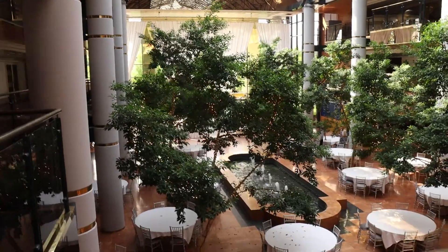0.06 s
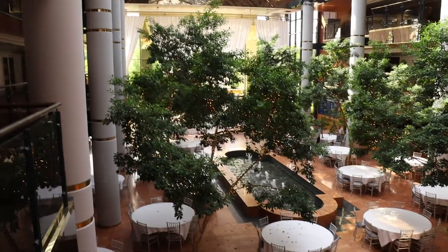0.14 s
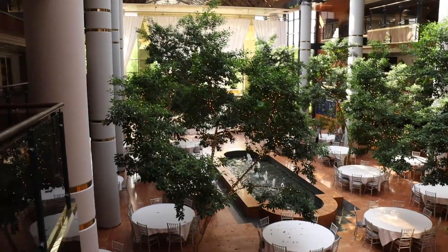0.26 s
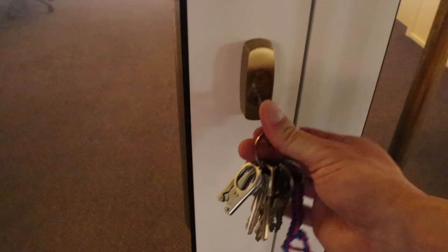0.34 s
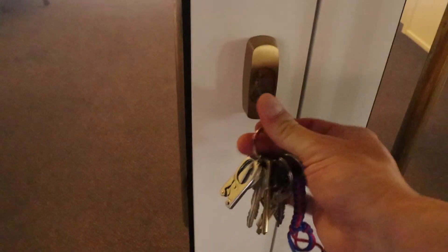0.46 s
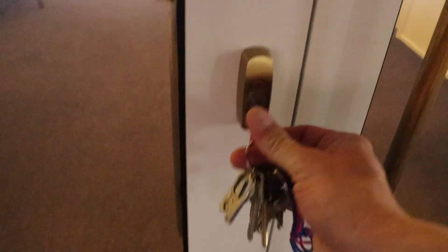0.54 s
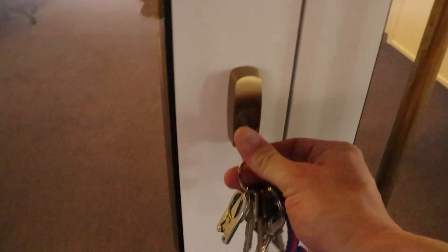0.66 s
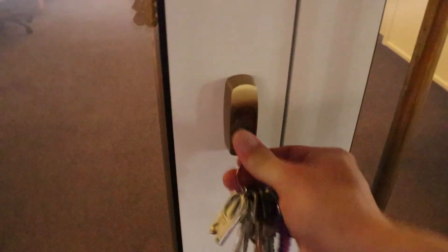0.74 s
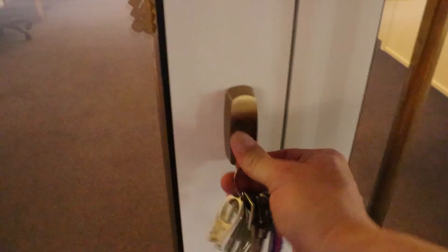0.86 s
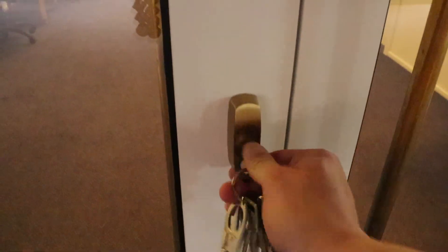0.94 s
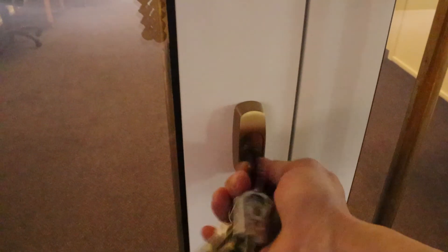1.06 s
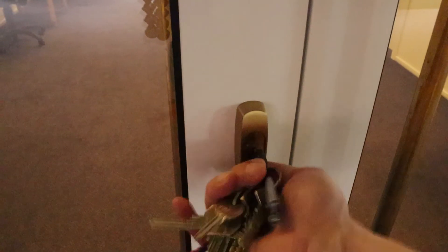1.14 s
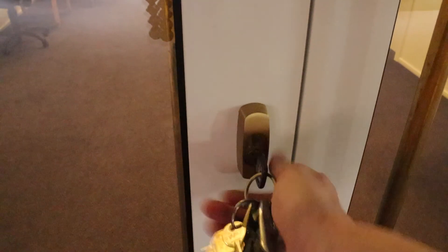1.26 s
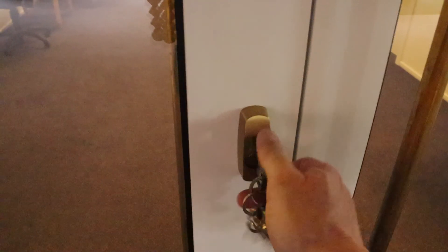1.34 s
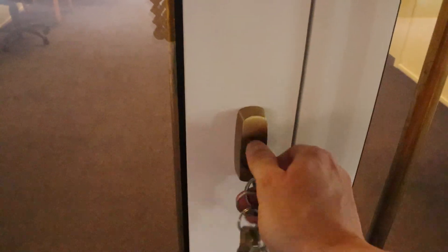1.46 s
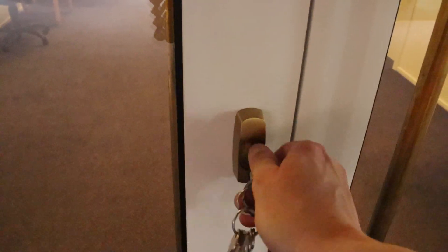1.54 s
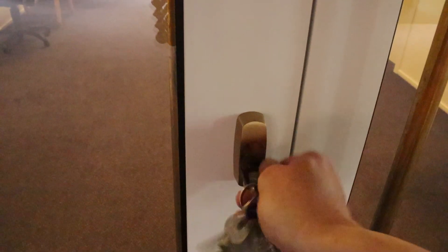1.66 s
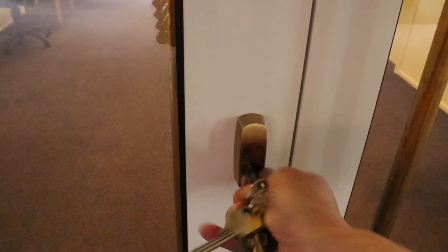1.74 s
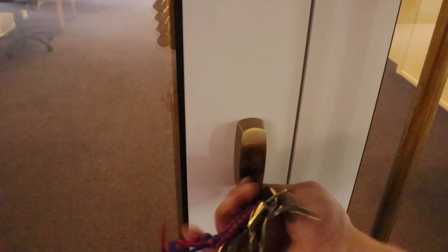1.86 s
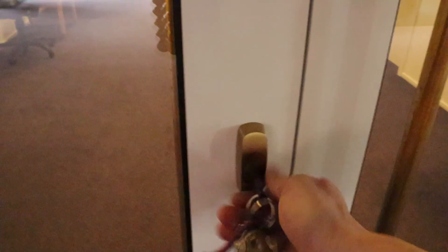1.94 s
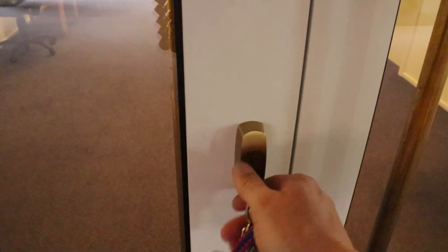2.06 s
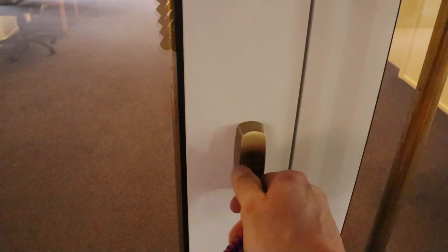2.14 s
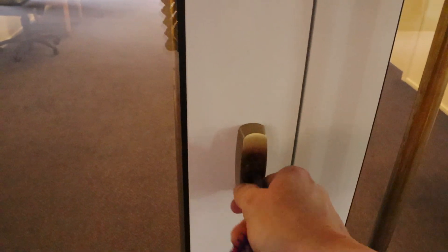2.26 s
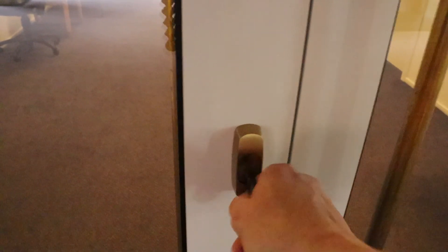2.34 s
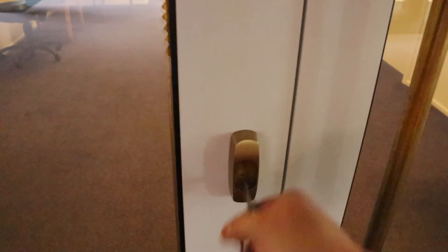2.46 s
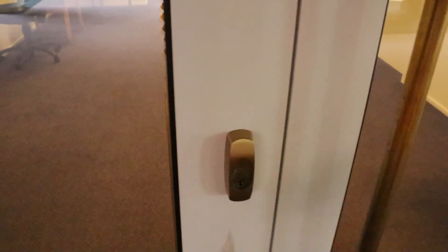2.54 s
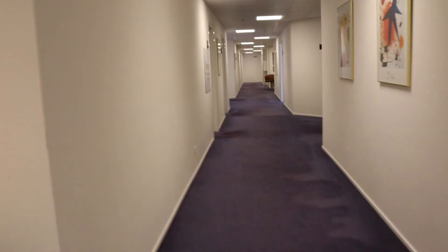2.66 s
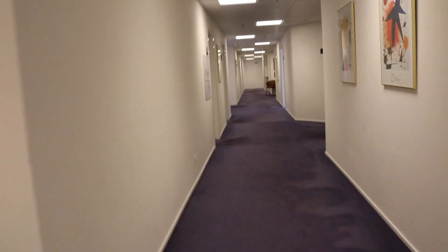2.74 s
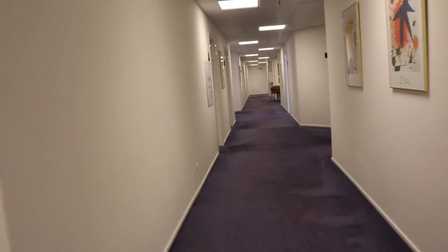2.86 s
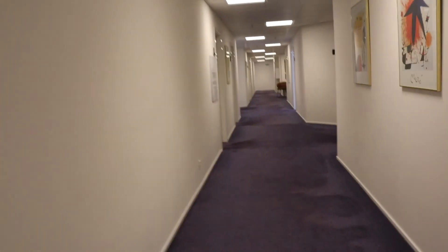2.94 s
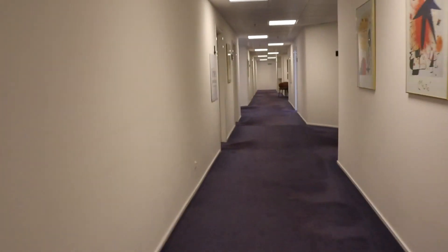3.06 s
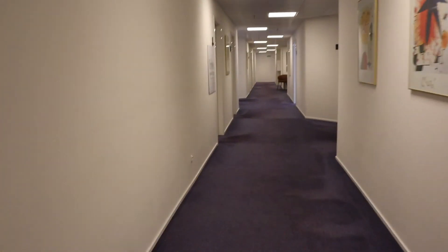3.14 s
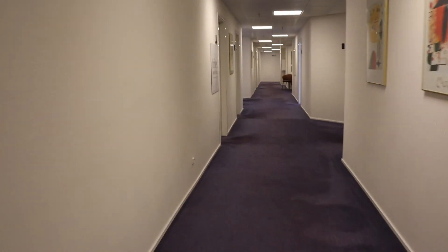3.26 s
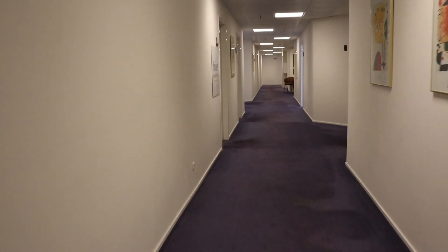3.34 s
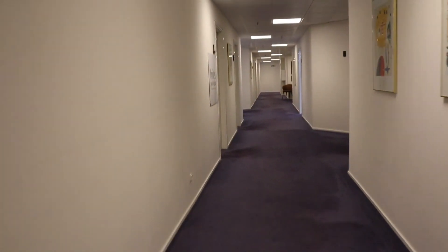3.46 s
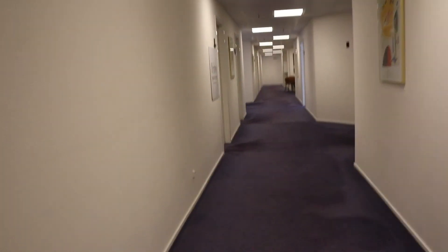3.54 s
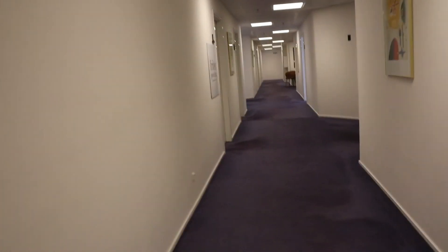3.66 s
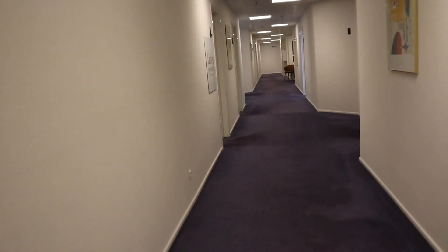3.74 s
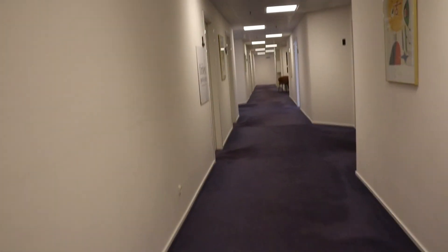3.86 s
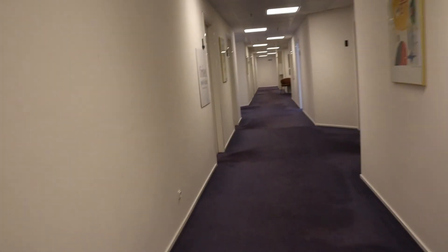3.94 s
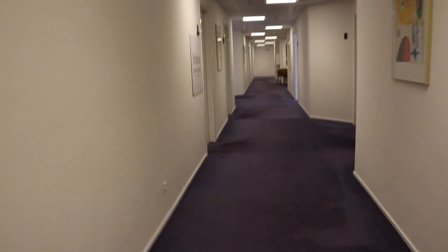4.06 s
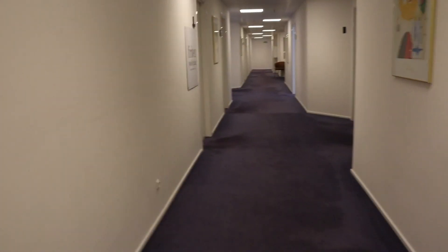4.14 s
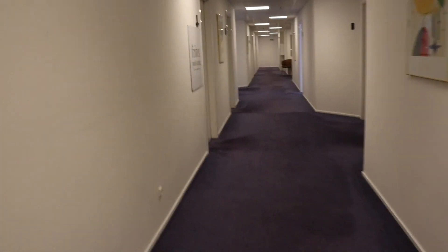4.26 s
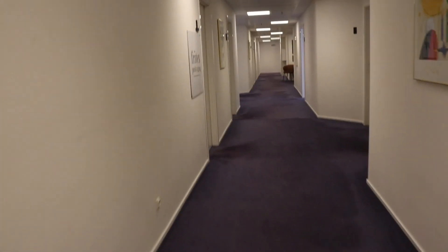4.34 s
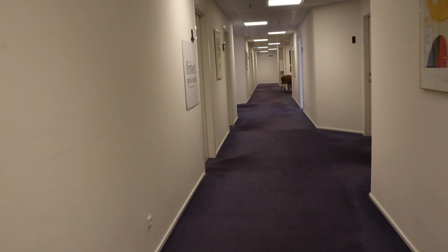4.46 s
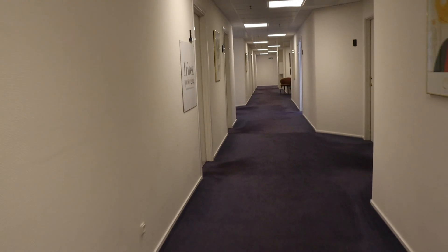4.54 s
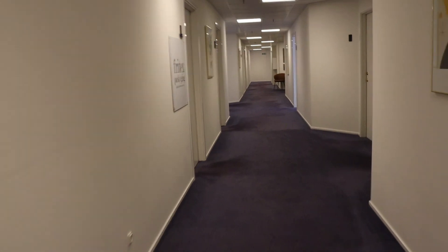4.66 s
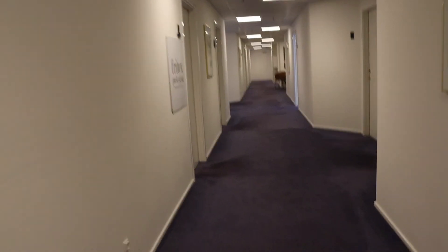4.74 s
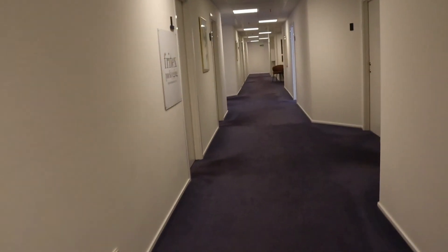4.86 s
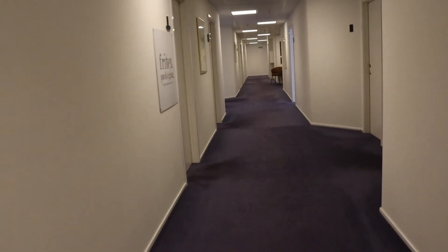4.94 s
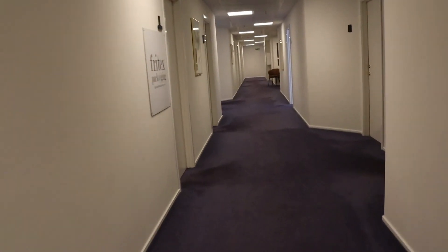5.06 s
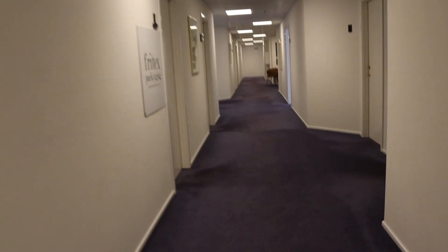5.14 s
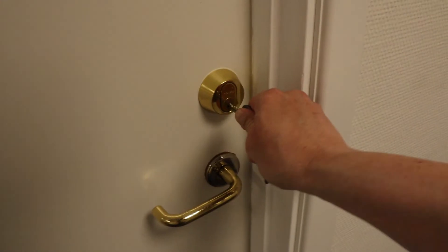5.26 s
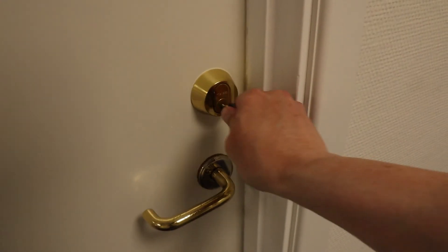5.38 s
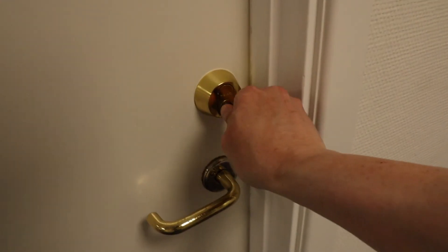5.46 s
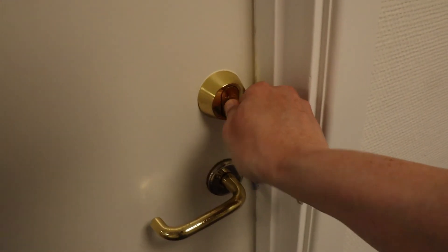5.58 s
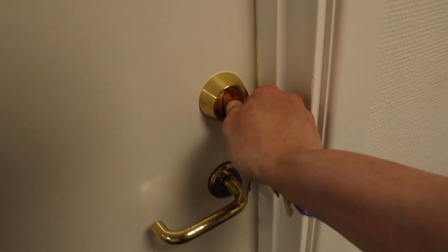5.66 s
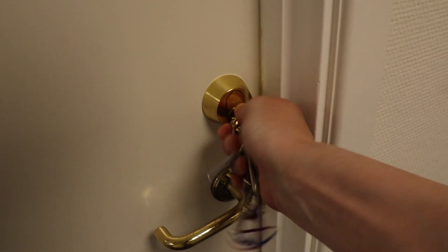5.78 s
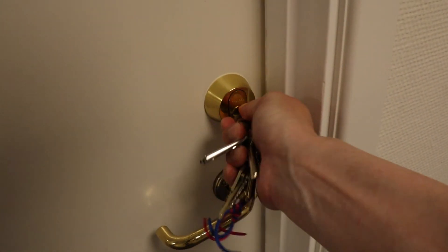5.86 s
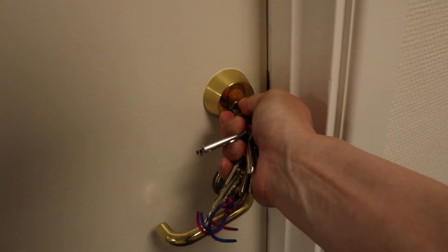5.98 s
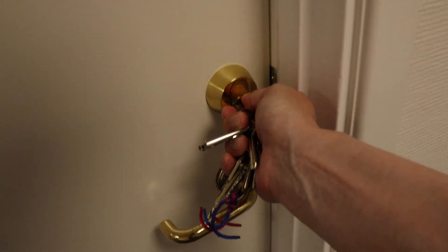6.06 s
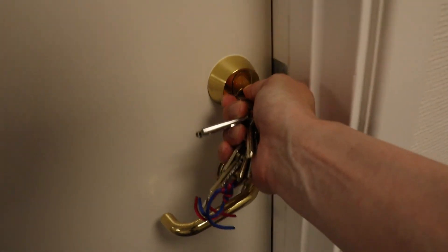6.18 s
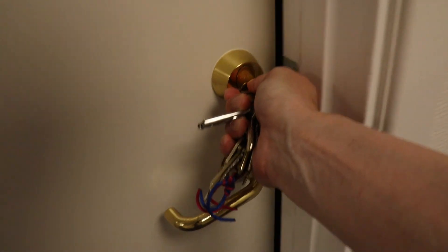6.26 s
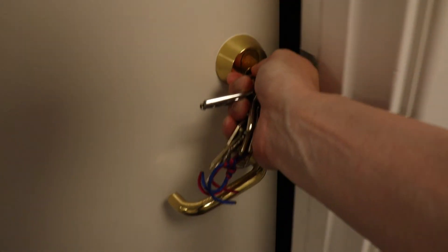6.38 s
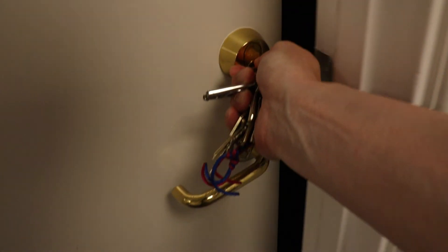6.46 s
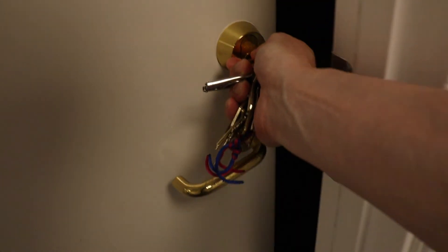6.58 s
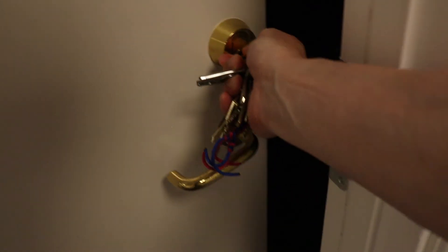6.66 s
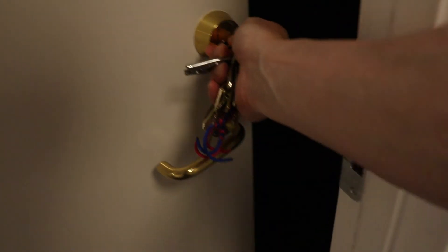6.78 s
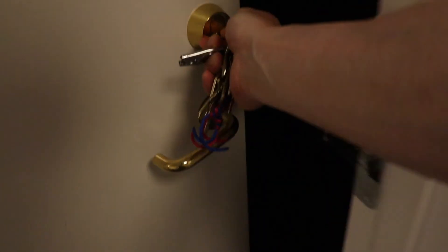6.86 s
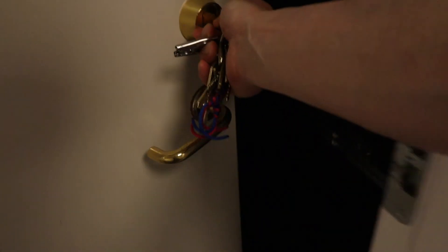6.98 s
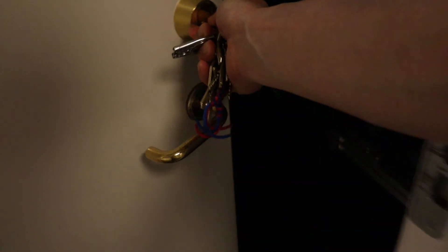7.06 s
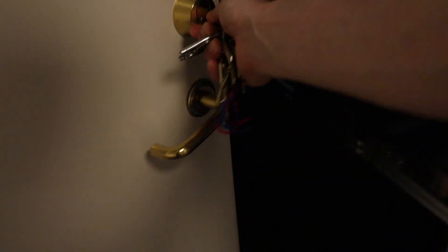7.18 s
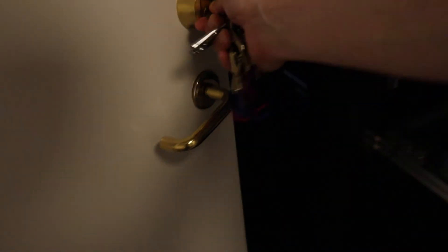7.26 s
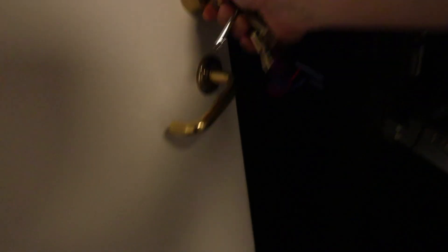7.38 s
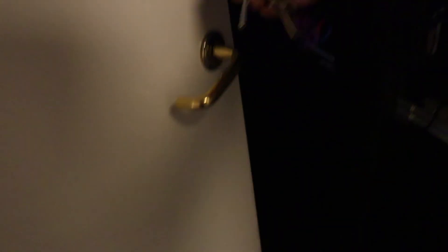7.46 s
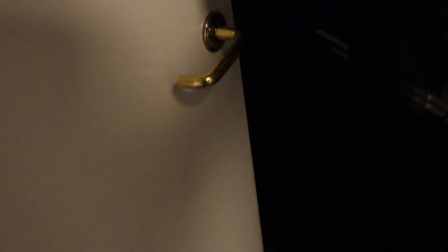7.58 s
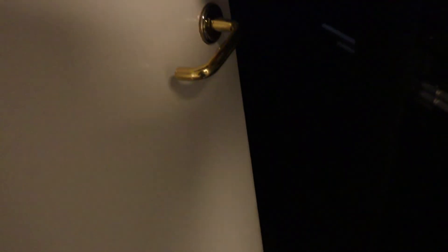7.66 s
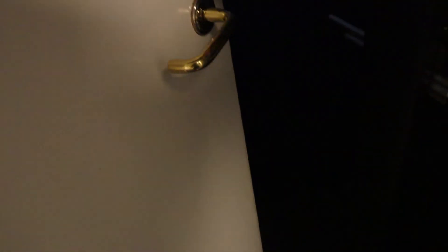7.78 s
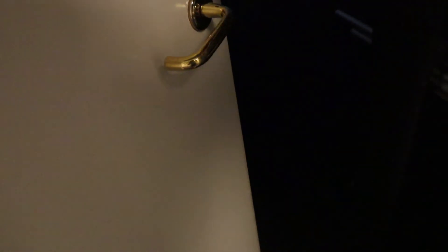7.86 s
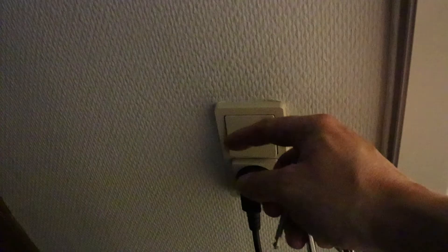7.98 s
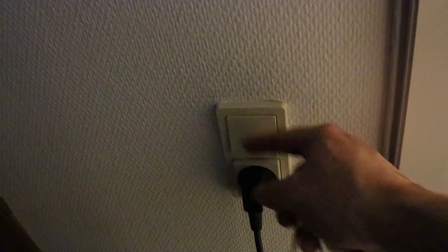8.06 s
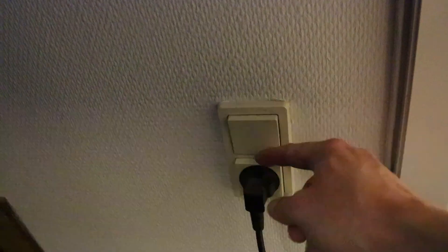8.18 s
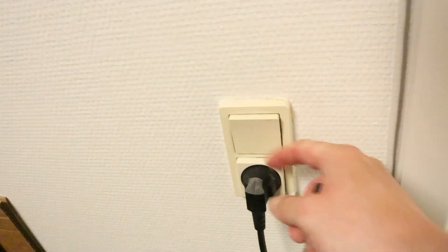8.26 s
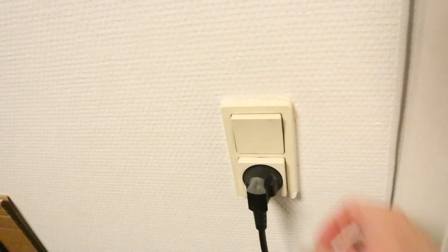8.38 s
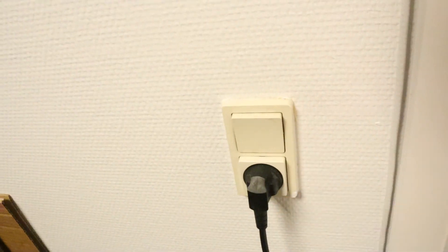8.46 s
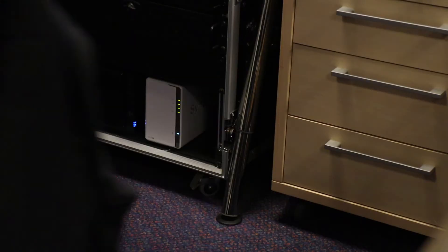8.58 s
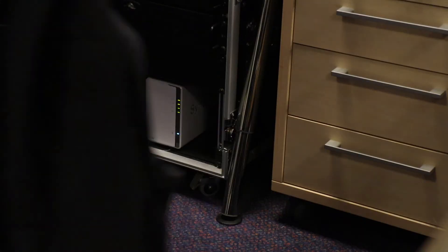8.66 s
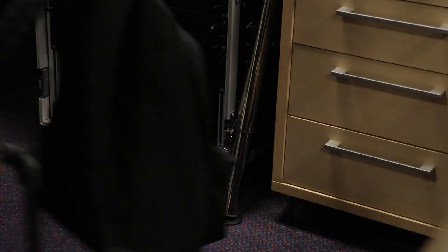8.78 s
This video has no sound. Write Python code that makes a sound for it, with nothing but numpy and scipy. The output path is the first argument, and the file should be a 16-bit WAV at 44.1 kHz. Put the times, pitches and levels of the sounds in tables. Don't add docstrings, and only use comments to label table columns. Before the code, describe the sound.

A door lock is worked with a jangling bunch of keys, followed by muffled carpet footsteps, quieter key clicks, a door thud and a switch click.

```python
import sys
import numpy as np
from scipy import signal
from scipy.fft import rfft, irfft
from scipy.io import wavfile
from scipy.ndimage import uniform_filter1d

SR = 44100
rng = np.random.default_rng(int(sys.argv[2]) if len(sys.argv) > 2 else 0)


def generate_wav(sig):
    pcm = np.round(np.clip(np.atleast_2d(sig).T, -1, 1) * 32767).astype(np.int16)
    wavfile.write(sys.argv[1], SR, pcm)


def linear_from_db(decibels):
    return 10 ** (np.asarray(decibels, float) / 20)


N = 388962
SIZE = 8192
HZ = np.fft.rfftfreq(SIZE, 1 / SR)
AGE_S = np.arange(SIZE) / SR

CUTS_S = 2.675, 8.032
# (time [s], clack [dB], door thud [dB re clack],
# tick [dB re clack], rattle t60 [s])
LOCK_1_BLOWS = [(.539, -37, -4, -19, 0.018), (.606, -55, -18, -30, 0.011), (.828, -31, -5.5, -28, 0.055),
                (.844, -28.5, 0.5, -47, 0.039), (.857, -17.5, -6.5, -22, 0.033), (.915, -39, 6, -6, 0.03),
                (1.022, -21.5, -4.5, -36, 0.028), (1.179, -38, -1, -20, 0.042), (1.197, -43, 3, -15, 0.28),
                (1.254, -49, 9, -4, 0.053), (1.337, -45, -2.5, 2, 0.099), (1.364, -35, -15, -23, 0.065),
                (1.445, -41, -3, -43.5, 0.021), (1.68, -30.5, 3, -24.5, 0.1),
                (1.734, -8.5, -2.5, -17, 0.049), (1.763, -23, -0.5, -16.5, .04),
                (1.921, -53, -22, 12, 0.12), (1.981, -48, -8, 2, 0.25), (2.428, -37.5, -4, -13.5, 0.076),
                (2.448, -28.5, -8, -47, 0.052), (2.49, -27, -4.5, -41, 0.042),
                (2.543, -30.5, -1.5, -28, 0.13), (2.566, -39, -14, -2.5, 0.012)]
# (time [s], clack [dB], door thud [dB re clack], tick [dB re clack])
KEY_ENTRY = [(3.014, -55, -16, -67.5), (3.461, -65.5, -1.5, -59), (3.718, -62.5, -6.5, -59.5),
             (4.134, -54.5, 1, -70.5), (5.241, -67, -4, -43.5), (5.293, -60.5, 1, -47),
             (5.307, -65, 4, -33), (5.332, -50, -4, -60), (5.363, -50.5, -4, -20),
             (5.395, -40, -6.5, -11.5), (5.413, -43, -4.5, -27), (5.436, -42.5, -1, -10),
             (5.447, -41.5, -1, -10.5), (5.473, -39.5, -2.5, -9.5), (5.495, -34, -5.5, -20),
             (5.502, -40.5, 0, -7), (5.518, -31.5, 0.5, -43), (5.531, -30, -19, -7)]
ENTRY_T60_S = 0.067
# (time [s], clack [dB], thud [dB re clack], tick [dB re clack], t60 [s])
KEY_TURN = [(5.674, -27.5, -11.5, -11.5, 0.059), (5.69, -29.5, -10, -64, 0.046), (5.756, -38, 0, -67, 0.26),
            (5.772, -25.5, -0.5, -6, 0.036), (5.786, -28, -28, -3, 0.049), (5.779, -23, -9, -13, 0.032),
            (5.79, -29.5, -14, -8, 0.052), (5.797, -29, -29, -6, 0.042), (5.85, -31, -9, -20, 0.22),
            (5.86, -25.5, -17, -15.5, 0.12), (5.887, -27, -3, -16, 0.069), (5.936, -36, -1, -25, 0.048),
            (5.996, -39, -3.5, -34, 0.13), (6.031, -54, -23, 1, 0.042), (6.058, -39, -14, -8, 0.24),
            (6.07, -29.5, -12, -5.5, 0.032), (6.235, -44.5, -6, -36, 0.079), (6.51, -54, 2.5, -23, 0.053),
            (6.554, -55.5, -7, -23, 0.044)]
# (time [s], clack [dB], thud [dB re clack], tick [dB re clack], t60 [s])
KEY_EXIT = [(7.154, -58, -22, -27, 0.055), (7.273, -75, -1, 3.5, 0.021), (7.355, -54, -2, -26, 0.098),
            (7.372, -44, -16, -13, 0.036), (7.386, -39, -8, -16, 0.079), (7.411, -46.5, -7, -4.5, 0.047),
            (7.462, -44, 2, -24, 0.2), (7.492, -23.5, -15.5, -15.5, 0.048), (7.549, -45, 5.5, -10, 0.17),
            (7.571, -38.5, -4, -11, 0.13), (7.609, -46.5, 5.5, -5.5, 0.12), (8.019, -70, -10, 7, 0.045)]
# (time [s], clack [dB], wall thud [dB re clack], tick [dB re clack], rattle t60 [s])
SWITCH_SNAPS = [
    (8.144, -38.5, -0.5, -21, 0.044),
    (8.165, -30.5, -3, 7, 0.039),
    (8.258, -66.5, -10, 7, 0.013),
    (8.386, -73, 4, 2.5, 0.016),
]
# (time [s], clack pitch [Hz], snap pitch [Hz],
# extra snap [dB])
PART_ACCENTS = [(.828, 1230, 3570, -3), (.844, 2600, 4200, 0.6), (4.134, 855, 1990, -2),
                (5.396, 1850, 2940, -3), (5.772, 1060, 3150, -5), (7.386, 1490, 2390, -4),
                (.857, 1040, 3470, 3.5), (1.022, 1690, 3600, 4.5), (1.364, 1660, 2880, -7),
                (1.68, 1880, 2900, -9), (1.734, 1650, 2850, 1), (1.763, 1450, 3900, -4),
                (5.674, 1800, 2540, -4), (5.691, 960, 3030, -3), (5.785, 1150, 3030, 0.5),
                (5.86, 1940, 2580, -2.5), (5.888, 1110, 3900, -0.3), (5.937, 1480, 3240, 7),
                (6.07, 1190, 2840, -5.5), (7.493, 1040, 3300, -1.5), (8.144, 2970, 5480, -1.5),
                (8.165, 2950, 5120, 0.5), (8.258, 3230, 5670, -7), (8.386, 3500, 5180, 1.7)]
ACCENT_DB, ACCENT_Q = 5, 4.2
# (frequency [Hz], width [Hz], level [dB])
LOCK_1_MODES = [(1140, 360, -6), (1630, 1700, -2.5), (2640, 250, 1), (2850, 260, 5), (3706, 420, 11.5),
                (4294, 2800, -2.5)]
# (frequency [Hz], width [Hz], level [dB])
LOCK_2_MODES = [(748, 60, -13), (1180, 300, -3), (1512, 90, -10), (1842, 300, 3), (2220, 500, 4),
                (3030, 650, 1.5), (4200, 510, -2.5)]
# (frequency [Hz], width [Hz], level [dB])
DOOR_1_MODES = [(170, 25, -6), (243, 16, 1.5), (290, 36, -1.5), (330, 24, -2), (355.6, 20, -2.5),
                (444.4, 99, -3.5)]
# (frequency [Hz], width [Hz], level [dB])
DOOR_2_MODES = [(156.5, 27, -0.5), (195, 91, -2.5), (367, 43, -9), (400, 154, -2.5), (486, 40, -29),
                (640, 900, 18.5)]
# (frequency [Hz], width [Hz], level [dB])
SWITCH_MODES = [(775, 410, 0.5), (1000, 340, -8.5), (1895, 980, 5), (2950, 16, -21), (3040, 330, 3),
                (7200, 30, -16), (3550, 610, -4), (4280, 400, 0.5), (5600, 1500, 9)]
# (frequency [Hz], width [Hz], level [dB])
WALL_MODES = [(145, 45.6, 1.5), (330, 46.4, -12.5), (506, 80, -9.5)]
# (time [s], stroke [s], grind [dB], rumble [dB re grind], rasp [dB re grind])
METAL_DRAGS = [
    (.815, .012, -39, -2, -17),
    (1.669, .012, -44, -2.5, -25),
    (1.708, 0.028, -38.5, -1, -22),
    (2.411, 0.1, -46, 9, -12),
    (2.52, 0.025, -38, -2, -11.5),
    (6.331, 0.497, -65, -8, -17.5),
    (7.804, 0.096, -46, 8.5, -1),
]
DRAG_RISE_S, DRAG_START_DB, DRAG_T60_S = 0.012, -24, 0.049
# (time [s], level [dB], chatter length [s])
KEY_JINGLES = [(0.876, -55, 0.054), (0.906, -51, 0.066), (0.973, -51.5, 0.0047), (1.06, -48, 0.033),
               (1.099, -53, 0.0047), (1.13, -59, 0.0094), (1.229, -52, 0.046), (1.27, -50, 0.045),
               (1.311, -47, 0.047), (1.347, -43, 0.12), (1.384, -46.5, 0.051), (1.409, -47, 0.019),
               (1.435, -47, 0.021), (1.533, -61, 0.011), (1.554, -50, 0.0063), (1.587, -65, 0.0095),
               (1.612, -52, 0.0029), (1.702, -49.5, 0.028), (1.768, -43, 0.021), (1.835, -56, 0.069),
               (1.894, -48, 0.017), (1.923, -34, 0.031), (1.997, -37.5, 0.03), (2.046, -43, 0.015),
               (2.081, -49.5, 0.076), (2.148, -43, 0.032), (2.183, -47.5, 0.025), (2.221, -44, 0.014),
               (2.253, -50.5, 0.017), (2.296, -54, 0.0034),
               (0.931, -56, 0.0088), (1.078, -64, 0.0077), (1.303, -54, .008), (1.864, -58, 0.02),
              (1.946, -43.5, 0.029), (1.978, -48, 0.012), (2.021, -40, 0.03), (2.058, -43.5, 0.017),
              (2.113, -59, 0.0093), (2.131, -53, 0.0066), (2.159, -44, .012), (2.21, -54, 0.0074)]
# (frequency [Hz], width [Hz], level [dB])
KEY_MODES = [(2000, 30, -14), (4520, 30, -8), (4980, 22, -4), (5960, 25, -4), (7280, 18, -3),
             (7850, 30, -9), (8850, 22, 0), (9620, 22, -1), (10100, 28, -1), (11750, 35, -10),
             (12170, 25, -8), (12930, 28, 2), (13940, 25, -6), (14600, 25, -7)]
FREE_RING_DB, CAUGHT_S = -7, 2.1
# (time [s], level [dB], pitch [Hz], t60 [s])
LEAF_BOOM = [
    (7.861, -36.5, 132.9, 0.68),
]
# (time [s], level [dB], pitch [Hz])
BODY_THUMPS = [(1.626, -34.5, 270), (2.905, -53, 230), (2.935, -44.5, 202), (3.004, -49, 169),
               (3.063, -46.5, 239), (3.132, -49.5, 228), (3.185, -43, 205), (3.241, -55, 168),
               (3.518, -45, 153), (3.624, -58.5, 212.6), (3.672, -58.5, 236), (3.736, -53, 217.6),
               (3.788, -48, 273), (3.835, -53, 211.6), (4.004, -42, 178.3), (4.079, -43.5, 220.4),
               (4.157, -50, 173), (4.256, -54, 157), (4.325, -48, 169.2), (4.58, -39.5, 189.6),
               (4.668, -65, 115), (4.72, -57.5, 317), (4.794, -50, 155.6), (4.858, -47, 278.6),
               (4.921, -50, 165.2), (5.019, -44, 152.4), (5.08, -41, 164.2), (5.193, -56.5, 103),
               (5.196, -48, 290), (6.901, -55, 149),
               (0.547, -47.5, 105), (0.863, -35, 110), (.925, -34, 243), (1.05, -51, 243), (2.431, -40, 101),
              (2.489, -42, 112), (2.552, -51, 100), (4.029, -47, 160), (4.11, -55, 197),
              (4.185, -51.5, 189), (4.214, -55, 262), (4.285, -52, 159), (4.625, -49, 252),
              (5.778, -45, 75.5), (5.86, -42, 90), (8.168, -45.5, 145)]
THUMP_S = 0.031
# (frequency [Hz], t60 [s])
ROOM_T60 = [(100, 0.14), (400, 0.31), (1500, 0.2), (4000, 0.093), (12000, 0.079)]
# (frequency [Hz], density [dB per Hz])
AIR_SPECTRUM = [(30, -24), (75, -23), (105, -3.5), (249, 3), (728, -1), (1290, -8.5), (5890, -35),
                (15500, -69)]
# (start [s], blend-in [s], hum [dB], body [dB], hiss [dB])
PLACE_AIR = [
    (0, .01, -61, -46, -52),
    (.5, 0.19, -54.5, -54.5, -66.5),
    (2.67, 0.0053, -70, -75.5, -81.5),
    (5.228, .008, -70, -75.5, -95.5),
    (5.33, 0.035, -71, -74.5, -88.5),
    (6.3, 0.069, -69, -74.5, -79),
    (8.03, 0.0065, -66.5, -73.5, -85.5),
    (8.598, 0.0076, -72.5, -73.5, -72.5),
]
# (hum share [dB/dB], body share [dB/dB], hiss share [dB/dB])
STIR_REACH = [(1, 0.055, 0.58), (0.72, 0.24, 2), (0.58, 0.73, 0.27), (0.087, 0.23, .1), (0.62, 1.06, 1.62),
              (0.54, 1.1, 1.14), (.3, 0.7, 1.6), (0.32, 1.13, 0.094)]
# (time [s], stir [dB], rise [s], fall [s])
AIR_STIRS = [(.6, 6.5, 0.23, 0.29), (.95, 6, 0.33, 0.46), (1.72, 8.5, 0.27, 0.6), (2.1, 6.5, 1.4, 0.28),
             (2.6, 3, 0.29, 0.21), (3.051, 13.5, 0.25, 0.26), (3.5, 8.5, 0.31, 0.43),
             (4.2, 12.5, 0.29, 0.3), (4.7, 12, 0.3, 0.48), (5.22, 12.5, 0.42, .012), (5.55, 15, 0.41, 0.79),
             (6.15, 21, 1.44, 0.51), (6.62, 12.5, 1.47, 0.56), (7.3, 0, 0.3, .4), (7.7, 9, 0.78, 0.23),
             (8.82, 8, 0.19, 0.097)]


def read(points, hz):
    f, value = np.transpose(points)
    return np.interp(np.log(hz + 1), np.log(f + 1), value)


def add(mix, s, sound):
    part = mix[round(s * SR):][:len(sound)]
    part += sound[:len(part)]


def band(hz, lo_hz, hi_hz):
    up, down = 1j * hz / lo_hz, 1j * hz / hi_hz
    high_pass = up ** 2 / (1 + np.sqrt(2) * up + up ** 2)
    return high_pass / (1 + np.sqrt(2) * down + down ** 2)


def modes(table, hz=HZ, spread_db=0):
    f, width, db = np.transpose(table)[:, :, None]
    if spread_db:
        db = db + spread_db * rng.standard_normal(db.shape)
    resonance = 1 / (1 / 2 + 1j * (hz - f) / np.maximum(width, 5))
    return (linear_from_db(db) / width * resonance).sum(0) * width.mean()


def peaked(drive, response, db):
    sound = irfft(rfft(drive, SIZE) * response, SIZE)
    peak_power = uniform_filter1d(sound ** 2, size=176).max()
    return linear_from_db(db) * sound / np.sqrt(peak_power + 1e-20)


def rattle(t60_s, grain_db, rise_s=0.0005):
    unevenness_db = grain_db * np.repeat(rng.standard_normal(SIZE // 32), 32)
    grains = rng.standard_normal(SIZE) * linear_from_db(unevenness_db)
    decay = linear_from_db(-60 * AGE_S / np.clip(t60_s, 0.004, 0.15))
    return grains * decay * np.minimum(AGE_S / rise_s, 1)


def blows(table, metal, panel, lag_s, top_hz, base_snap_db, sharp, fastest_s, crack_size):
    out = np.zeros(N)
    body = band(HZ, 630, 2000) ** 2
    edge = band(HZ, 2440, 3030) ** 2
    treble = band(HZ, 4100, top_hz) ** 2
    drum = band(HZ, 150, 1500) * band(HZ, 160, 580)
    crack = 1 + crack_size * linear_from_db(-60 * AGE_S / 0.0055)
    for s, db, thud_db, tick_db, t60_s in table:
        snap_db = base_snap_db + sharp * tick_db
        rise_s = np.clip(0.00027 * linear_from_db(-1.2 * (db + 23.5)), fastest_s, 0.005)
        drive = rattle(t60_s, 2.0, rise_s) * crack
        response = modes(metal, spread_db=2.5) + 0.8
        low, high = response * body, response * edge
        for accent_s, low_hz, high_hz, extra_db in PART_ACCENTS:
            if abs(accent_s - s) >= 0.005:
                continue
            low_part = 1 + modes([(low_hz, low_hz / ACCENT_Q, ACCENT_DB)])
            high_part = 1 + modes([(high_hz, high_hz / ACCENT_Q, ACCENT_DB - 6)])
            low = (low / abs(low).max() + 0.1) * body ** 0.5 * low_part
            high = band(HZ, 0.7 * high_hz, 1.25 * high_hz) ** 2 * high_part
            snap_db += extra_db
        clack = peaked(drive, low, db)
        snap = peaked(drive * linear_from_db(-120 * AGE_S), high, db + snap_db)
        tick = peaked(rattle(0.54 * t60_s, 3.8, rise_s / 2), treble, db + tick_db)
        panel_response = (modes(panel, spread_db=3.5) + 1.4) * drum
        thud = peaked(rattle(1.7 * t60_s, 4.4, 0.003), panel_response, db + thud_db)
        add(out, s - 0.0003, clack + snap + tick)
        add(out, s + lag_s, thud)
    return out


def drags():
    out, size = np.zeros(N), 4 * SIZE
    hz, t = np.fft.rfftfreq(size, 1 / SR), np.arange(size) / SR
    for s, stroke_s, grind_db, rumble_db, rasp_db in METAL_DRAGS:
        rise_db = DRAG_START_DB * np.maximum(1 - t / DRAG_RISE_S, 0)
        db = grind_db + rise_db - 60 * np.maximum(t - stroke_s, 0) / DRAG_T60_S
        unevenness_db = 4.2 * np.repeat(rng.standard_normal(SIZE // 24 + 1), 96)[:size]
        slips = rng.standard_normal(size) * linear_from_db(unevenness_db)
        big_slips = slips * np.sqrt(abs(slips))
        lock, door = (LOCK_2_MODES, DOOR_2_MODES) if s > CUTS_S[0] else (LOCK_1_MODES, DOOR_1_MODES)
        brass = (modes(lock, hz) + 0.89) * band(hz, 620, 3430) ** 2
        leaf = (modes(door, hz) + 1.3) * band(hz, 140, 1000) ** 2
        treble = band(hz, 2500, 5500) ** 2
        for drive, path, path_db in [(slips, brass, 0), (slips, leaf, rumble_db),
                                     (big_slips, treble, rasp_db)]:
            part = irfft(rfft(drive) * path)
            add(out, s, part / part.std() * linear_from_db(db + path_db))
    return out


def jingles():
    out = np.zeros(N)
    for s, db, length_s in KEY_JINGLES:
        after_s = np.maximum(AGE_S - length_s, 0)
        chatter = rattle(0.1, 6.5, 0.003) * linear_from_db(-60 * after_s / 0.015)
        detune = rng.uniform(0.96, 1.04)
        held = modes(np.multiply(KEY_MODES, [detune, 16, 1]), spread_db=5.0) + 1.2
        loose = modes(np.multiply(KEY_MODES, [detune ** 0.1, 1.4, 1]), spread_db=5.5)
        ring = peaked(chatter, loose, db + FREE_RING_DB - 10 * (s > CAUGHT_S))
        knock = peaked(chatter, held * band(HZ, 2200, 11500), db)
        add(out, s - 0.001, knock + ring * linear_from_db(-60 * after_s / 0.045))
    return out


def boom():
    out = np.zeros(N)
    s, db, hz, t60_s = LEAF_BOOM[0]
    envelope = linear_from_db(db - 60 * AGE_S / t60_s) * (1 - np.exp(-AGE_S / 0.013))
    add(out, s, envelope * np.sin(2 * np.pi * hz * AGE_S))
    return out


def thumps():
    out = np.zeros(N)
    for s, db, hz in BODY_THUMPS:
        u = AGE_S / (THUMP_S * linear_from_db(1.8 * rng.standard_normal()))
        swell = u * np.exp(-3.0 * u ** 2)
        drift = 1.76 * np.cumsum(rng.standard_normal(SIZE)) / np.sqrt(SR / hz)
        wobble = np.sin(2 * np.pi * hz * AGE_S + drift)
        puff = rng.standard_normal(SIZE) * u * np.exp(-1.5 * u)
        rustle = peaked(puff, band(HZ, 300, 1000), db - 27.5)
        thump = peaked(swell * wobble, band(HZ, 0.3 * hz, 1.8 * hz) * band(HZ, 0.45 * hz, 2200), db)
        add(out, s - 0.004, thump + rustle)
    return out


def walls(x, stretch=1):
    taps = np.zeros(SR)
    at = np.arange(300, SR - 8, 8)
    taps[at + rng.integers(0, 8, len(at))] = rng.choice([-1., 1.], len(at))
    hz, t, z = signal.stft(taps, SR, nperseg=256)
    t60_s = np.maximum(stretch * read(ROOM_T60, hz), 0.02)
    tail = signal.istft(z * linear_from_db(-60 * t / t60_s[:, None]), SR, nperseg=256)[1]
    return signal.fftconvolve(x, tail / np.linalg.norm(tail))[:N]


def air_levels(t):
    s, db, rise_s, fall_s = np.transpose(AIR_STIRS)[:, :, None]
    triangle = np.minimum(1 + (t - s) / rise_s, 1 - (t - s) / fall_s)
    stir_db = np.maximum(db * triangle, 0).max(0)
    start_s, blend_s, *levels_db = np.transpose(PLACE_AIR)
    inside = np.clip((t - start_s[:, None]) / np.maximum(blend_s, 0.002)[:, None], 0, 1)
    share = inside - np.vstack([inside[1:], 0 * t])
    share[0] = 1 - inside[1]
    return np.array(levels_db) @ share + np.transpose(STIR_REACH) @ share * stir_db


def air():
    frames, hz = N // 256 + 5, np.fft.rfftfreq(1024, 1 / SR)
    s = np.arange(0, N + 64, 64) / SR
    a, b, patches = rng.standard_normal((frames, 513, 3)).T
    patches = uniform_filter1d(uniform_filter1d(patches, size=8, axis=0), size=8, axis=1)
    flat = (a + 1j * b) * linear_from_db(1.3 * patches / patches.std())
    colour = linear_from_db(read(AIR_SPECTRUM, hz))
    out = np.zeros(N)
    for level_db, (lo_hz, hi_hz) in zip(air_levels(s), [(28, 400), (450, 2500), (2500, 23000)]):
        shape = colour * abs(band(hz, lo_hz, hi_hz)) ** 2
        part = signal.istft(flat * shape[:, None], nperseg=1024, noverlap=768)[1][:N]
        out += part / part.std() * linear_from_db(np.interp(np.arange(N) / SR, s, level_db))
    return out


def scene():
    t, drag = np.arange(N) / SR, drags()
    first = blows(LOCK_1_BLOWS, LOCK_1_MODES, DOOR_1_MODES, lag_s=0.0037, top_hz=9986,
                  base_snap_db=6.9, sharp=0.3, fastest_s=0.00059, crack_size=2.2)
    first += jingles() + drag * (t < CUTS_S[0])
    key_work = [(*row, ENTRY_T60_S) for row in KEY_ENTRY] + KEY_TURN + KEY_EXIT
    second = blows(key_work, LOCK_2_MODES, DOOR_2_MODES, lag_s=0.00214, top_hz=4000,
                   base_snap_db=0.61, sharp=0.14, fastest_s=0.0022, crack_size=0.32)
    second += drag * (t > CUTS_S[0])
    switch = blows(SWITCH_SNAPS, SWITCH_MODES, WALL_MODES, lag_s=0.0018, top_hz=3260,
                   base_snap_db=1.04, sharp=0.4, fastest_s=0.0011, crack_size=1.35)
    hall = (first + linear_from_db(-17.5) * walls(first)) * (t < CUTS_S[0])
    doorway = (second + linear_from_db(-13.0) * walls(second) + boom()) * (t < CUTS_S[1])
    switch_room = switch + linear_from_db(-22) * walls(switch, 2.37)
    return (hall + doorway + switch_room + thumps() + air())[None]


def band_limit(x):
    return signal.sosfilt(signal.butter(12, 16480, fs=SR, output="sos"), x)


def record(dry):
    ceiling = 0.95
    limited = ceiling * np.tanh(dry / ceiling)
    low_pass = signal.firwin(511, 15900, window=("kaiser", 9), fs=SR)
    mix = signal.oaconvolve(limited, low_pass[None], "same")
    return band_limit(mix)


dry = scene()
out = record(dry)
generate_wav(out)
```